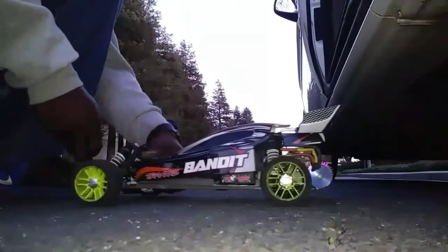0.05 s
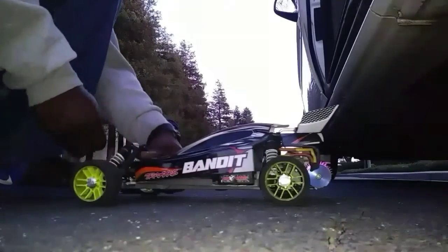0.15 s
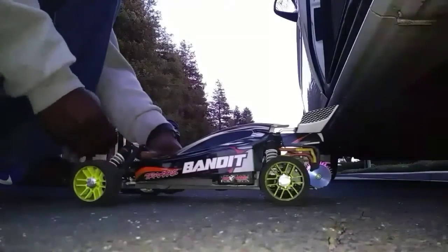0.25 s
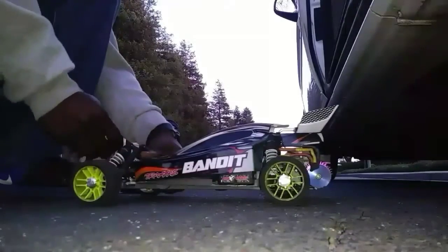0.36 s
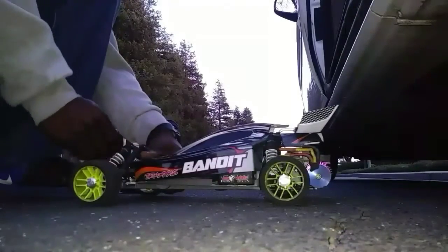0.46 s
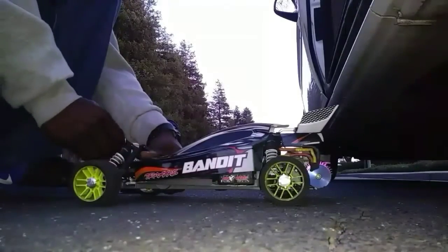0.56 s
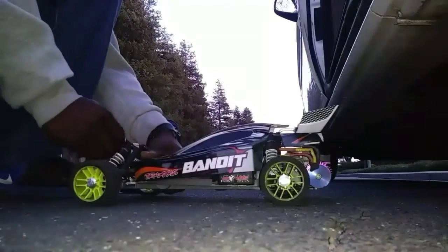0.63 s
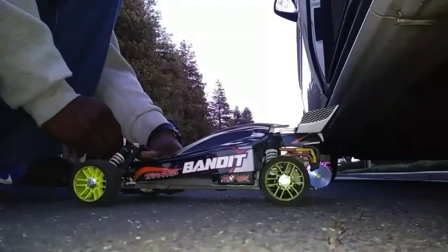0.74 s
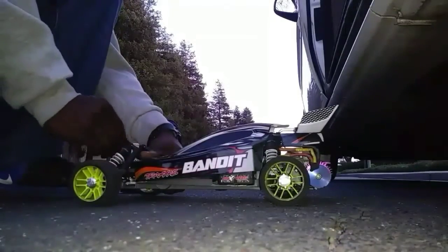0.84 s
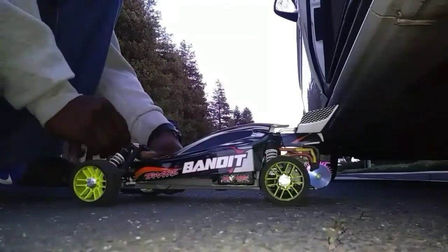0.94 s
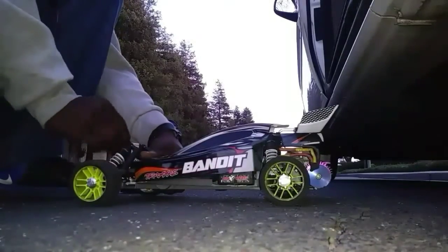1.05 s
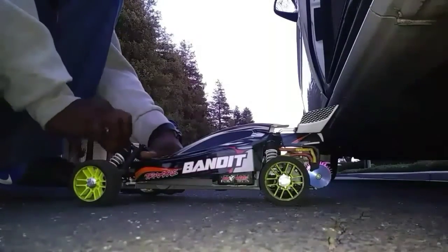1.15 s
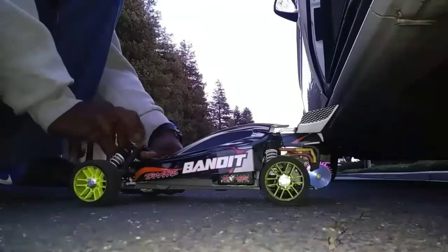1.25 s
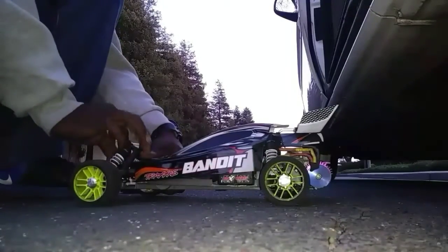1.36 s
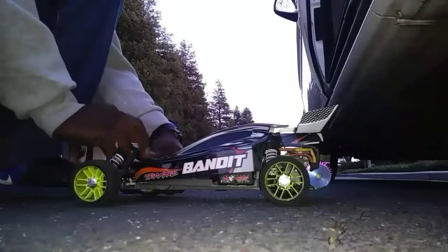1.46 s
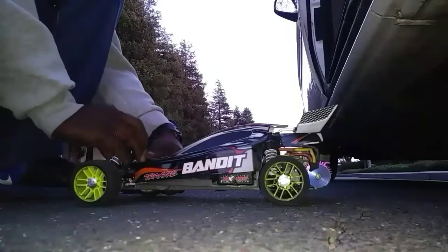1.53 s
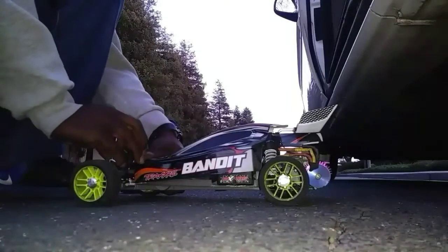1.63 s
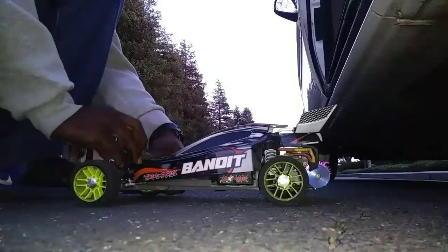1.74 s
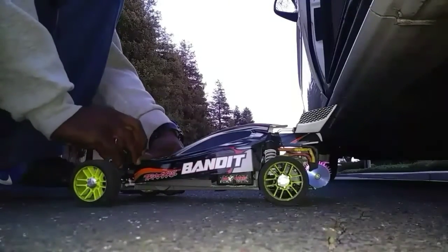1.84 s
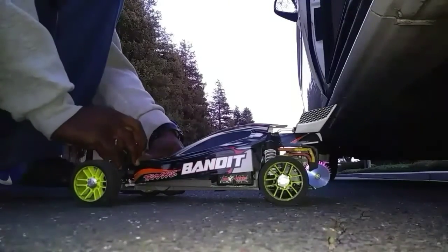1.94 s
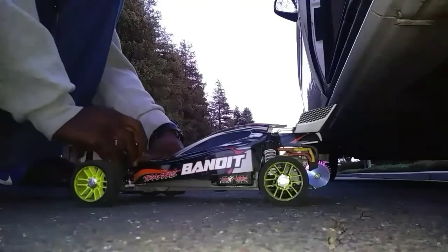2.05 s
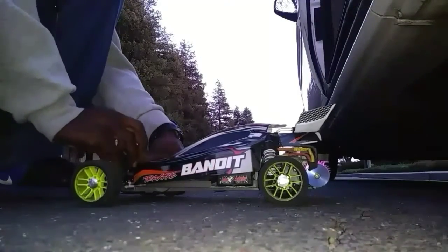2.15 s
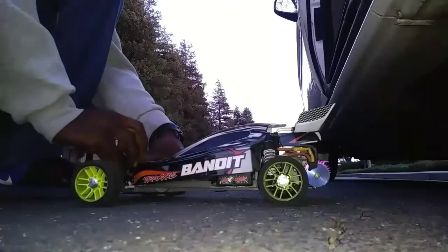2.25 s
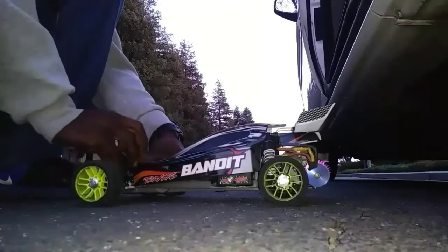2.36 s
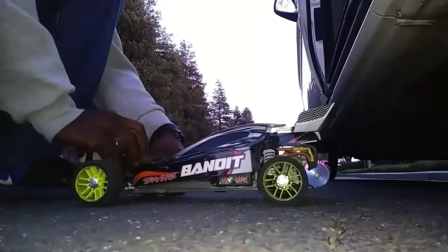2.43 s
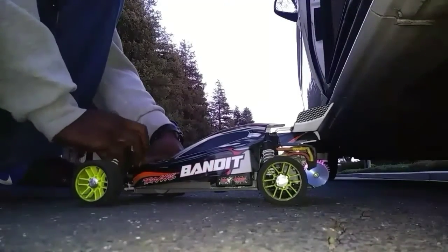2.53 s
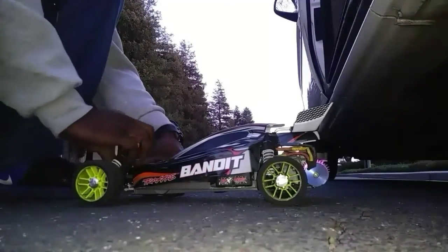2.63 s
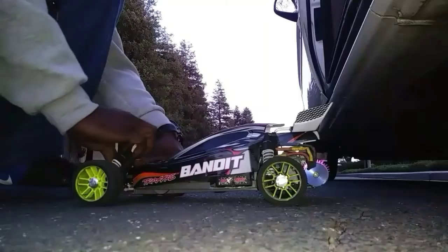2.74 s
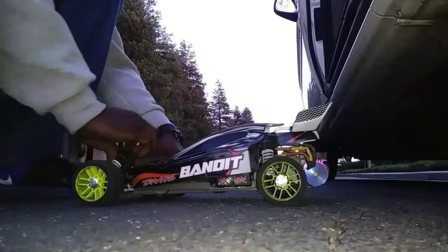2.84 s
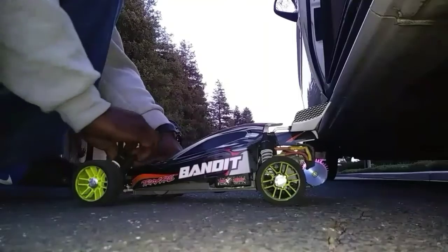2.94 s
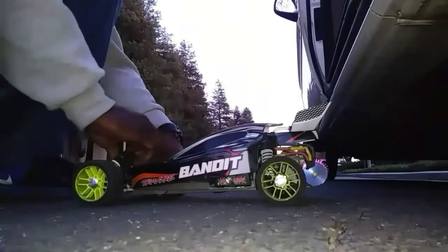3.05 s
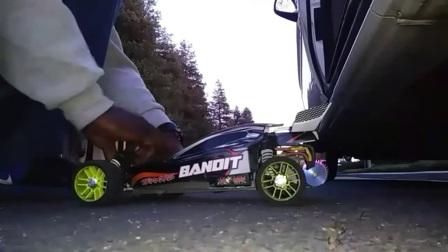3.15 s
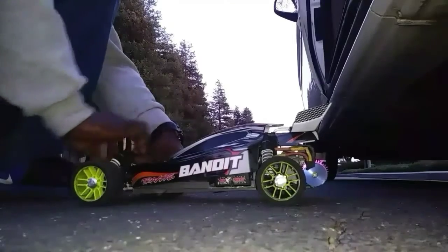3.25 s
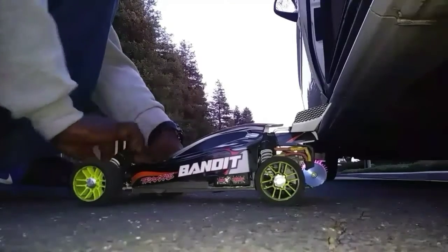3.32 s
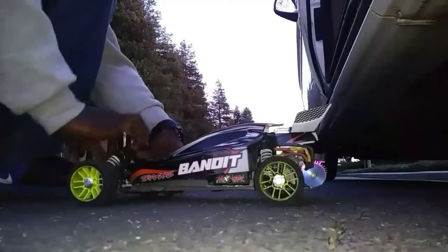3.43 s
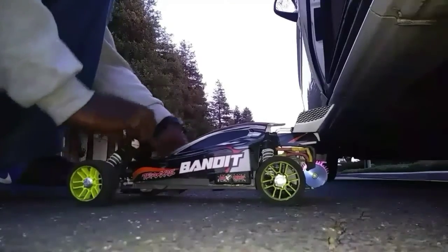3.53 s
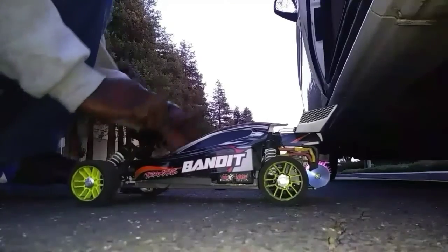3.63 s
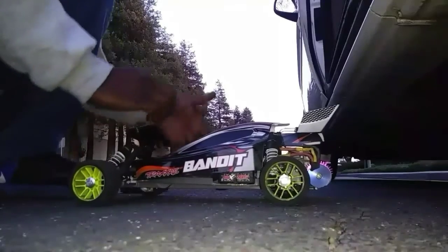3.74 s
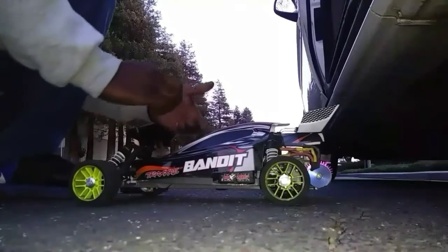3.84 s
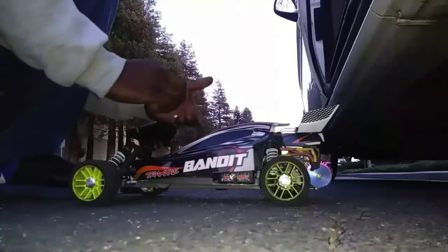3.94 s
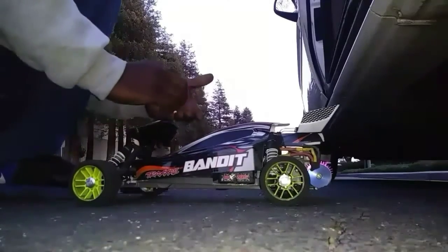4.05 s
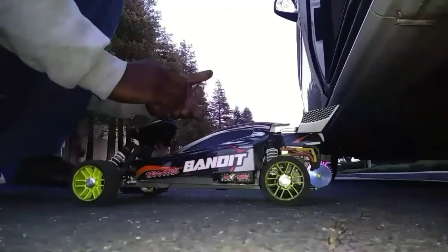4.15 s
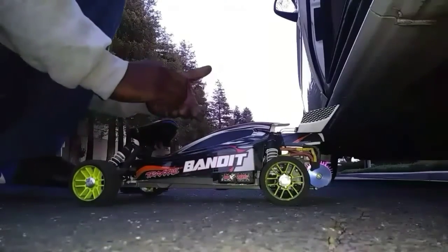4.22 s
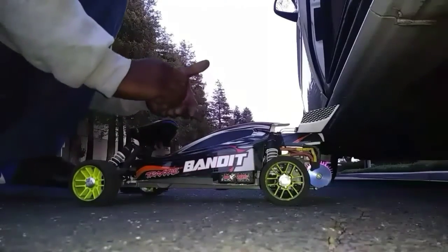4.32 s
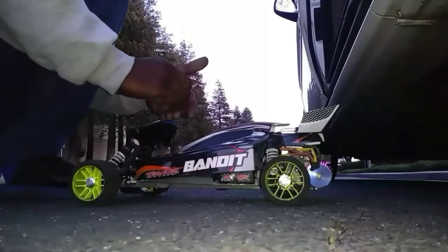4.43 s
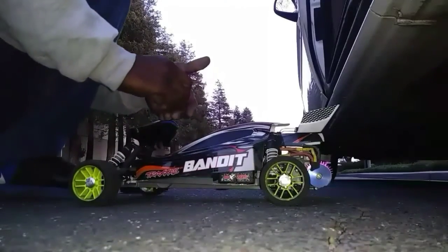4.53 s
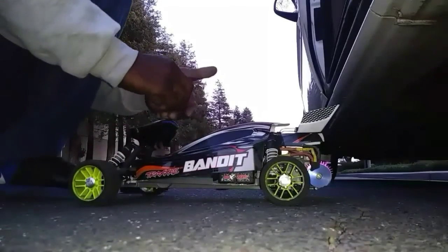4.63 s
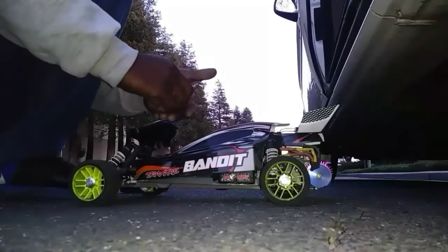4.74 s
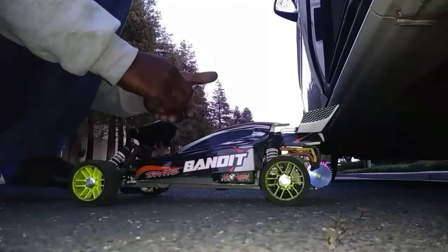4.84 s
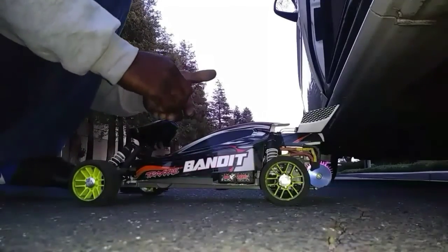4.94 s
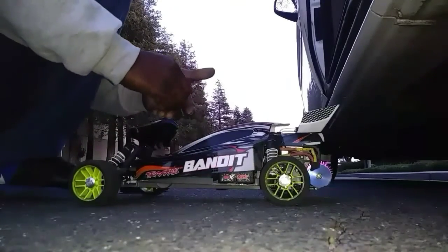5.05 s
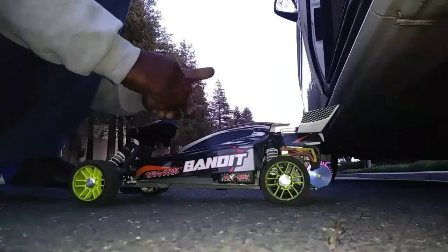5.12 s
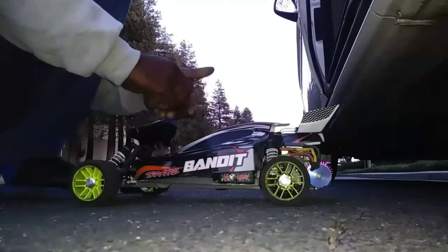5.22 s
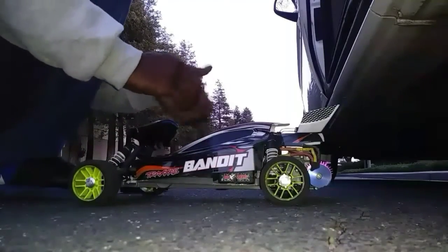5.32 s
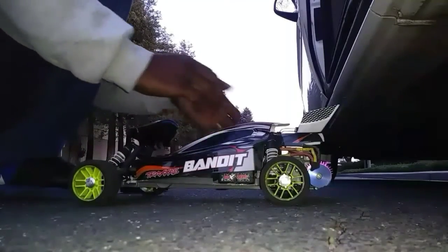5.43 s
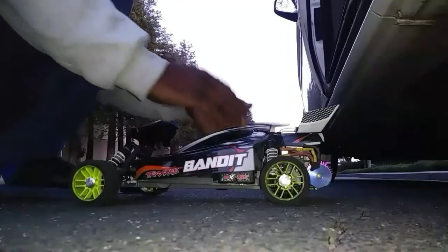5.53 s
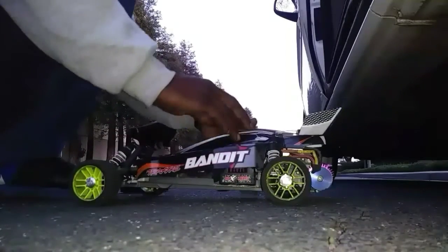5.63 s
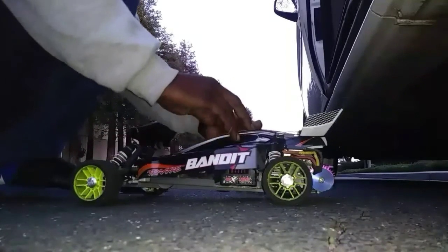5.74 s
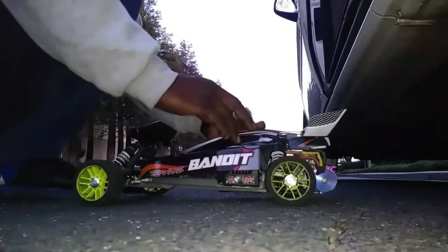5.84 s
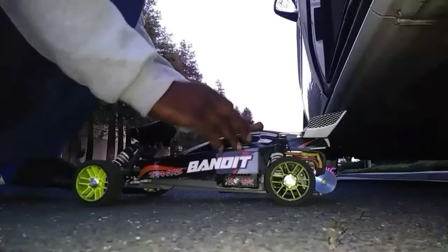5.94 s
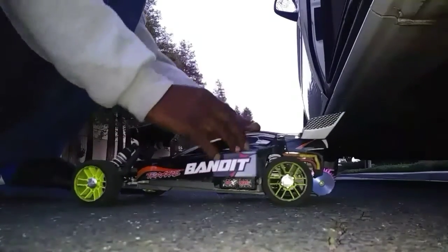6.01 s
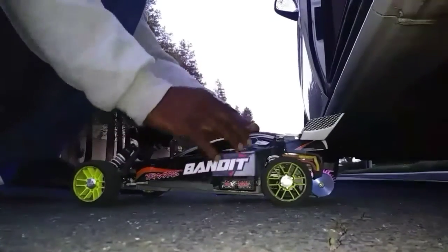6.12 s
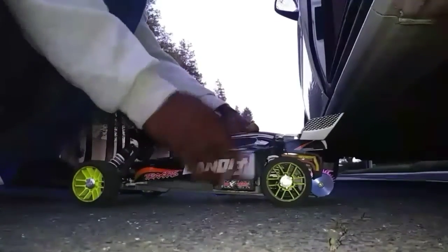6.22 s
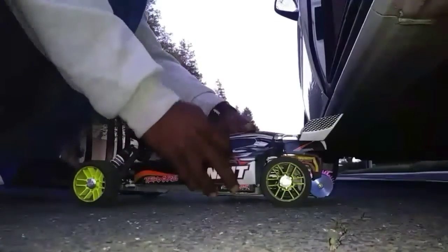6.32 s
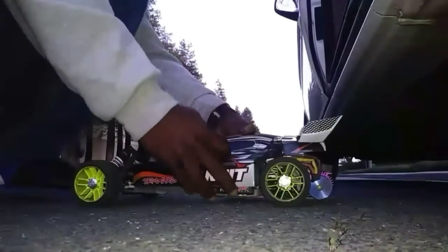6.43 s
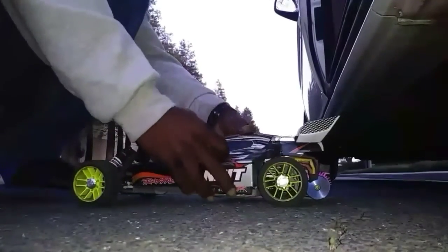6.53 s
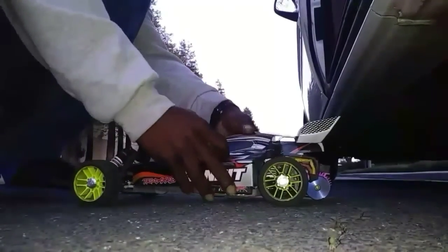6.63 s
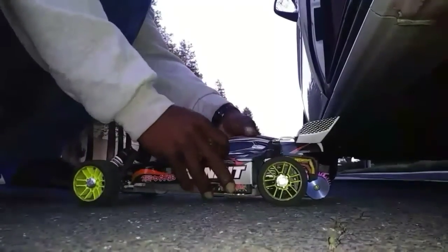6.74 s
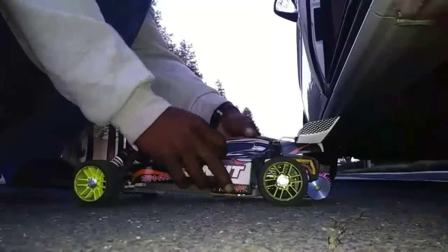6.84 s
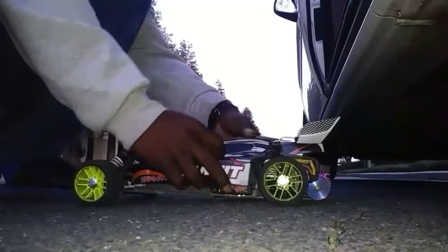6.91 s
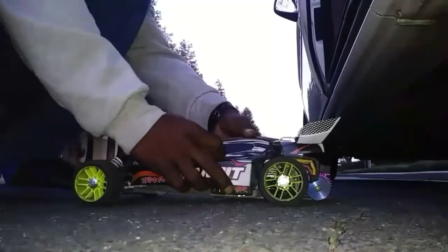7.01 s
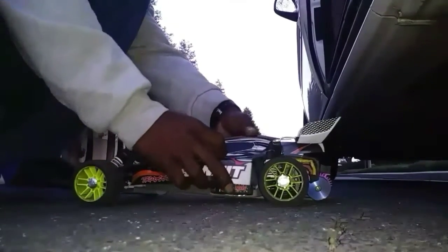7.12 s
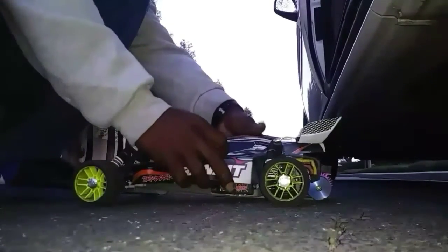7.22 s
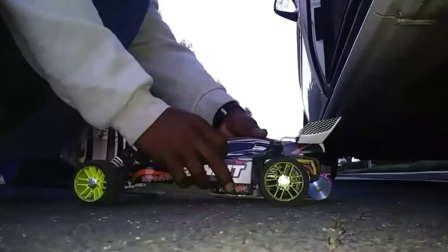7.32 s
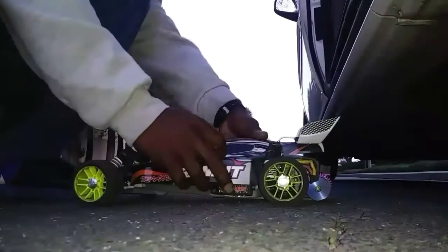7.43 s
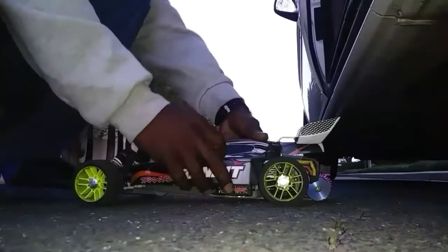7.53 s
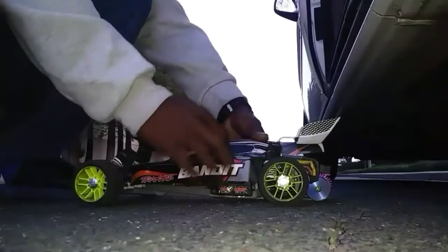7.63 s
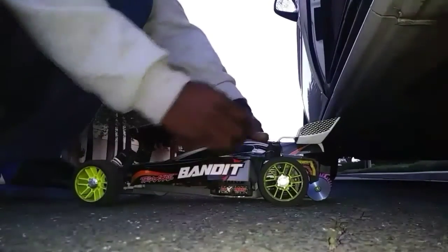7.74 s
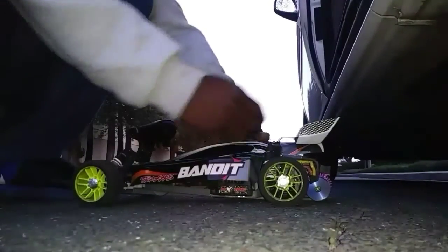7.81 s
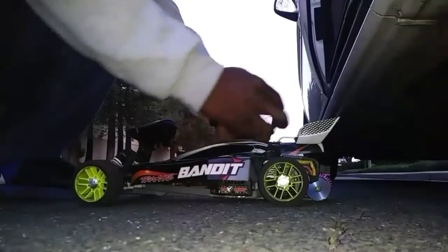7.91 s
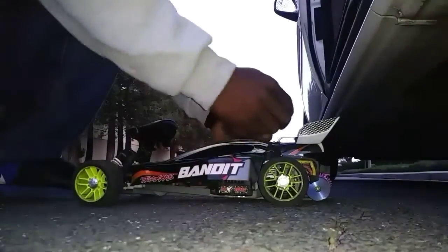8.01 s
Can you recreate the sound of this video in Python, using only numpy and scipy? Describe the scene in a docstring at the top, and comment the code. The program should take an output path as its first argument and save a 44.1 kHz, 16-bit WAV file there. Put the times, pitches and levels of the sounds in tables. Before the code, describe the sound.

Fingers snap clips and tap a thin plastic model car shell outdoors, with irregular clicks, rattles and rubbing over very faint distant traffic.

```python
"""Hands fit parts on a small plastic model car on asphalt: clips snap, the thin shell is tapped, scraped, rubbed.
Noise bursts and stick-slip grains excite the resonant modes of the shell; soft bumps are wavering low tones.
A parked van's side and the ground return a short diffuse tail, made by convolution with decaying noise.
Behind lie far traffic, a lumpy coloured noise, and a faint grainy whine of narrow noise bands.
A pocket camera's noise suppressor sinks whatever is not clearly above the steady background."""
import sys
import numpy as np
from scipy import signal
from scipy.fft import rfft, irfft, next_fast_len
from scipy.io import wavfile
from scipy.ndimage import uniform_filter1d

SR = 44100
rng = np.random.default_rng(int(sys.argv[2]) if len(sys.argv) > 2 else 0)


def log_audio(samples):
    """Write samples as a 16-bit WAV file to the path given in sys.argv[1]."""
    # one column per channel
    frames = np.atleast_2d(samples).T
    # limit to full scale, then quantise
    limited = np.clip(frames, -1, 1)
    pcm = np.round(limited * 32767).astype(np.int16)
    wavfile.write(sys.argv[1], SR, pcm)


N = 355874

# Far traffic spectrum, relative: (frequency [Hz], spectral density [dB per Hz])
TRAFFIC_SPECTRUM = [(25, -29), (40, -13), (55, -1.5), (108, -6.5), (330, -14.5), (750, -13.5),
                    (1300, -17.5), (4000, -24.5), (8000, -36.5)]
TRAFFIC_DB = -53  # RMS before the lumps are added
# Whine, noise bands: (centre [Hz], width of one of two cascaded resonances [Hz], level [dB], flicker [dB])
WHINE_BANDS = [(167.3, 8.3, -66.5, 0), (441, 88, -68, 3.5), (1459, 90, -68, 2), (1880, 120, -74, 3),
               (2290, 130, -73, 2.5), (2902, 250, -77, 3), (4300, 130, -79, 3), (4930, 230, -65.5, 0.5),
               (5260, 160, -74.5, 3), (5720, 260, -79.5, 3)]
YARD_T60_S, YARD_DB = 0.17, -13.5
# Low bumps that swell and fade: (time of the top [s], peak level [dB], pitch [Hz], Gaussian length [s])
LOW_BUMPS = [(0.458, -48.5, 297, 0.035), (5.311, -41.5, 102.7, 0.022), (5.914, -43.5, 163.7, 0.033),
             (6.904, -43, 69.2, .04), (7.546, -45.5, 78.9, 0.043)]

# Modes of the plastic shell: (frequency [Hz], gain [dB], t60 before the damping factor shortens it [s])
SHELL_MODES = [(251, 5.5, 0.12), (397, 3, 0.22), (546.5, 5, 0.11), (320, -10, 0.19), (1087, 4, 0.19),
               (1386, -5, 0.58), (2028, -10.5, 0.19), (4910, -2, 0.019)]
# Centres of bass, mid and treble: (frequency [Hz])
BAND_CENTRES = [500, 2000, 6500]
# Fingers sliding on the shell, one list per spell: (time [s], mid level [dB], treble minus mid [dB])
RUB_SPELLS = [
    [(2.67, -86, -11.5), (2.9, -62.5, -14.5), (3.128, -61, -14.5), (3.26, -45, -18.5), (3.43, -64.5, -22.5),
     (3.52, -52, -21.5), (3.78, -56, -26)],
    [(5.55, -52, -16), (5.65, -43, -5.5), (5.73, -46.5, -13), (5.77, -51, -3.5), (6.12, -54, -28),
     (6.41, -51.5, -14), (6.55, -58.5, -20), (6.745, -45.5, -35.5), (6.96, -62, -19), (7.07, -50.5, -21.5),
     (7.22, -47, -16), (7.3, -52.5, -17), (7.5, -50, -20), (7.67, -61.5, -6), (8.07, -58, -10)],
]
RUB_BASS_DB = -8.5  # relative to mid
PATCHY_DB = 1.3  # each band of the rubbing flickers by itself

# Short scrapes that swell and die: (time [s], peak level [dB], contact pitch [Hz], rattle t60 [s])
SCRAPE_EVENTS = [(0.01, -38, 2640, 0.18), (0.3605, -43, 2590, 0.45), (0.64, -43.5, 2004, 0.45),
                 (0.9893, -46, 2313, 0.26), (1.508, -45, 2370, 0.11), (1.737, -45, 1407, 0.26),
                 (2.682, -41.5, 5550, 0.55), (2.7458, -36.5, 3490, 0.19), (2.986, -44, 3770, 0.16),
                 (3.339, -31.5, 648, 0.27), (3.4577, -37.5, 1953, 0.39), (3.956, -38.5, 3410, 0.58),
                 (4.1423, -37, 5586, 0.13), (5.4529, -20.5, 1870, 0.12), (5.462, -11, 1900, 0.076),
                 (6.239, -31, 950, 0.2), (6.5724, -27.5, 1230, 0.41), (6.614, -19.5, 1050, 0.076),
                 (6.777, -33, 1195, 0.4), (7.429, -14.5, 4860, 0.035), (7.4529, -31, 5200, 0.2),
                 (7.4815, -28, 1900, 0.051)]
SCRAPE_RISE_S = 0.0045
# tilt against mid at 1 kHz contact pitch: smaller contacts move less of the shell and are brighter
SCRAPE_BASS_DB, BASS_DB_PER_OCTAVE = -1.5, -6.5
SCRAPE_TREBLE_DB, TREBLE_DB_PER_OCTAVE = -11.5, 1
# Snaps and taps: (time [s], peak level [dB], contact pitch [Hz], bass tilt against mid [dB],
# treble tilt against mid [dB], rattle t60 [s])
HIT_EVENTS = [(1.223, -41, 3550, -45, -5.5, 0.25), (1.627, -32, 912, 8.5, -25.5, 0.12),
              (2.132, -42.5, 1140, 0, -37, 0.18), (2.427, -34.5, 3600, -41.5, -15, .12),
              (3.057, -31, 5400, -68, -10.5, 0.43), (3.1385, -27.5, 4900, -46, -9, 0.12),
              (3.1701, -19, 4200, -40, -6, 0.15), (3.183, -29, 2600, -27, -7, 0.056),
              (3.1963, -11.5, 2520, -13, -12.5, 0.052), (3.263, -26.5, 2580, -3, -8, 0.037),
              (3.491, -30, 1110, -8, -7, 0.26), (3.5493, -26.5, 4800, -46, -6.5, 0.16),
              (3.5927, -7, 2960, -34.5, -16.5, 0.032), (3.6538, -29.5, 5300, -22, -7.5, 0.13),
              (4.441, -38.5, 3900, -54.5, -22.5, 0.048), (4.466, -32, 4070, -56, -18, 0.14),
              (5.477, -7, 990, 7, -14, 0.095), (5.5098, 5, 1930, 5, -7.5, 0.061),
              (5.521, -6, 5100, 11, -12.5, 0.037), (5.615, -31, 1360, 16, -21, .04),
              (5.8733, -30.5, 2260, -10, -6, 0.12), (5.895, -34, 1240, 1.5, -15, 0.087),
              (5.9414, -37, 1300, -22, -12, 0.074), (6.038, -29.5, 2190, -28.5, -14.5, 0.066),
              (6.1534, -11.5, 1380, -1.5, -5, 0.075), (6.177, -18.5, 1480, 4.5, -4, 0.099),
              (6.189, -19.5, 1420, 5.5, -9, 0.097), (6.254, -33, 1100, 17, -14, 0.027),
              (6.313, -31.5, 1250, -12, -23, 0.2), (6.359, -29.5, 1190, -4, -7, 0.05),
              (6.4291, -20, 1240, -9, -18.5, 0.19), (6.443, -28, 1320, 9, -25, 0.24),
              (6.469, -24, 1090, -2, -17.5, 0.13), (6.489, -24, 1370, 3.5, -10, 0.25),
              (6.5974, -13.5, 1300, -1, -16, 0.093), (6.804, -29, 1250, 3, -8.5, 0.04),
              (6.937, -36.5, 1360, -12, -10, 0.095), (7.0184, -20.5, 1280, 8.5, -16, 0.089),
              (7.05, -30, 2300, 17, 0, 0.23), (7.153, -38.5, 1190, -9, -26.5, 0.023),
              (7.176, -25.5, 1190, -10.5, -18, 0.035), (7.322, -27.5, 1100, -12.5, -19, 0.09),
              (7.3615, -11.5, 2070, -13.5, -20.5, 0.052), (7.389, -10, 2140, 0.5, -10.5, 0.067),
              (7.709, -28.5, 940, -5.5, -13, .12), (7.9787, -29.5, 1180, 5, -10.5, 0.089),
              (8.0351, -22, 1260, 8.5, -17.5, 0.098), (8.0592, -22, 2410, -5, -10, 0.1)]
HIT_RISE_S, CRACK_S = 0.0006, 0.00094
AIR_DB, AIR_DB_PER_DB = -1.5, 1  # 12 kHz over treble for a 0 dB blow; softer blows reach less high
# Valleys in the hits, scrapes and rubs: (centre [Hz], Gaussian width [Hz], gain [dB])
HANDLING_VALLEYS = [(810, 110, -5.5), (4050, 250, -5)]

# Camera's dull voice-band filter: (frequency [Hz], gain [dB])
VOICE_BAND_FILTER = [(30, -8), (100, 0), (8200, 0), (9300, -15), (11500, -32), (16000, -36)]
DEPTH_DB = -25  # lowest gain of the suppressor
HISS_DB, TOP_HZ = -79, 15800


def undb(db):
    """Level law: an amplitude ratio is 10 to the power of dB / 20."""
    return 10 ** (np.asarray(db) / 20)


def unit(x):
    """Normalization: division by the root mean square gives unit power."""
    return x / np.sqrt(np.mean(x ** 2))


def shape(x, gain):
    """Linear filtering: the spectrum is multiplied by a function of frequency."""
    n = next_fast_len(x.shape[-1])
    hz = np.arange(n // 2 + 1) * SR / n + 1  # 1 Hz up, to keep clear of zero
    return irfft(rfft(x, n) * gain(hz), n)[..., :x.shape[-1]]


def colour(points):
    """Spectral envelope: (Hz, dB) points are interpolated along log frequency."""
    hz, db = np.transpose(points)
    return lambda f: undb(np.interp(np.log(f), np.log(hz), db))


def mode(f, hz, width):
    """Damped resonance: a second-order response with gain 1 at its centre."""
    return 1j * f * width / (hz ** 2 - f ** 2 + 1j * f * width)


def walk(rate):
    """Slow modulation: random levels held 1 / rate s, slewed twice, softly limited; spread between 1.5 and 2."""
    k = int(SR / rate)
    steps = np.repeat(rng.standard_normal(N // k + 1), k)
    slewed = uniform_filter1d(uniform_filter1d(steps, k), k)[:N]
    return 3.16 * np.tanh(0.99 * slewed)


def traffic():
    """Broadband noise of far traffic: coloured rumble whose low bands fluctuate independently."""
    far = unit(shape(rng.standard_normal(N), colour(TRAFFIC_SPECTRUM)))
    total = far.copy()
    for hz in (57.6, 110, 186, 257.4):
        band = shape(far, lambda f: np.abs(mode(f, hz, hz * 0.53)) ** 2)
        total += band * (undb(2.57 * walk(9)) - 1)
    return undb(TRAFFIC_DB) * total


def whine():
    """Narrow-band noise: cascaded resonances pick steep bands, most of them flickering independently."""
    total = np.zeros(N)
    for hz, width, db, flicker_db in WHINE_BANDS:
        band = unit(shape(rng.standard_normal(N), lambda f: mode(f, hz, width) ** 2))
        total += undb(db + flicker_db * walk(22)) * band
    return total


def yard(x):
    """Diffuse reflection: van side and ground return a short, exponentially decaying tail."""
    t = np.arange(SR // 2) / SR
    decay = np.exp(-np.log(1000) * t / YARD_T60_S)
    onset = np.minimum(t / 0.0062, 1)
    tail = rng.standard_normal(len(t)) * decay * onset
    return undb(YARD_DB) * signal.fftconvolve(x, tail / np.sqrt(np.sum(tail ** 2)))[:N]


def bumps():
    """Amplitude and frequency modulation: soft low pushes, each a few wavering cycles."""
    t = np.arange(N) / SR
    wavering_t = t + 0.061 * np.cumsum(walk(30)) / SR
    total = np.zeros(N)
    for s, db, hz, length in LOW_BUMPS:
        swell = np.exp(-.5 * ((t - s) / length) ** 2)
        total += undb(db) * swell * np.sin(2 * np.pi * hz * wavering_t)
    return total


def shell(f, scatter_db, damp=5.8, broad_db=-4):
    """Modal superposition: the plastic shell's damped modes, each scattered in level, over a broad response."""
    response = undb(broad_db)
    for (hz, db, t60), scatter in zip(SHELL_MODES, scatter_db):
        width = damp * np.log(1000) / (np.pi * t60)
        response = response + undb(db + scatter) * mode(f, hz, width)
    return response


def rubs():
    """Stick-slip friction: dense grains in uneven gusts drive the shell, levelled in bass, mid and treble."""
    t, rows = np.arange(N) / SR, np.vstack(RUB_SPELLS)
    mid_db = np.interp(t, rows[:, 0], rows[:, 1])
    treble_db = np.interp(t, rows[:, 0], rows[:, 2])
    on = sum((t >= spell[0][0]) & (t < spell[-1][0]) for spell in RUB_SPELLS)
    fade = uniform_filter1d(on * 1., size=2000)

    slips = rng.standard_normal(N) * undb(2.5 * rng.exponential(size=N) + 1.5 * walk(60))
    even = np.zeros(len(SHELL_MODES))  # no scatter among the modes
    body = shape(slips, lambda f: shell(f, even, damp=5.1, broad_db=-1.0) / (1 + (f / 6800) ** 6))

    def flickering_band(hz):
        """Band filtering: a cascaded resonance at unit power, with its own flicker."""
        band = unit(shape(body, lambda f: mode(f, hz, 2.36 * hz) ** 2))
        return undb(PATCHY_DB * walk(25)) * band

    bass, mid, treble = (flickering_band(hz) for hz in BAND_CENTRES)
    return fade * undb(mid_db) * (mid + undb(RUB_BASS_DB) * bass + undb(treble_db) * treble)


def strike(events, crack, clump_db):
    """Impulsive excitation: a dying, clumpy rattle, led by any crack, rings shell and contact resonance."""
    out, t = np.zeros(N + SR), np.arange(2 ** 14) / SR
    lead = 64  # samples kept ahead of each event for the ripple of the zero-phase tilt
    for s, db, hz, bass_db, treble_db, t60, rise in events:
        grains = rng.standard_normal(len(t))
        scatter = rng.standard_normal(len(SHELL_MODES))
        lumps = uniform_filter1d(np.repeat(rng.standard_normal(128), 128), size=48)
        decay = np.exp(-np.log(1000) * t / t60)
        rattle = undb(clump_db * lumps) * decay * (1 - np.exp(-t / rise))
        snap = crack * hz / 2000 * t / CRACK_S * np.exp(1 - t / CRACK_S)
        push = grains * (rattle + snap)
        ring = shape(push, lambda f: shell(f, 3 * scatter) + 1.18 * mode(f, hz, hz / 5))

        air_db = treble_db + AIR_DB + AIR_DB_PER_DB * db
        tilt_hz = [150, *BAND_CENTRES, 12000]
        tilt_db = [bass_db - 20.5, bass_db, 0, treble_db, air_db]
        ring = shape(np.roll(ring, lead), colour(list(zip(tilt_hz, tilt_db))))
        i = int(s * SR) - lead
        out[i:i + len(t)] += ring * undb(db) / np.abs(ring).max()
    return out[:N]


def scrapes():
    """Slow-onset friction: rattles without a crack, tilted in bass and treble by contact pitch."""
    events = []
    for s, db, hz, t60 in SCRAPE_EVENTS:
        octaves = np.log2(hz / 1000)
        bass_db = SCRAPE_BASS_DB + BASS_DB_PER_OCTAVE * octaves
        treble_db = SCRAPE_TREBLE_DB + TREBLE_DB_PER_OCTAVE * octaves
        events.append((s, db, hz, bass_db, treble_db, t60, SCRAPE_RISE_S))
    return strike(events, crack=0, clump_db=2.0)


def hits():
    """Impact: clips and taps give a brief crack and a fast-rising rattle."""
    return strike([(*hit, HIT_RISE_S) for hit in HIT_EVENTS], crack=1.125, clump_db=3.0)


def handling_valleys(f):
    """Spectral notching: Gaussian dips in dB lower parts of the handling sound."""
    return undb(sum(db * np.exp(-.5 * ((f - hz) / width) ** 2) for hz, width, db in HANDLING_VALLEYS))


def scene():
    """Linear superposition: hits, scrapes and rubs with their tail, over bumps, whine and traffic."""
    hands = shape(hits() + scrapes() + rubs(), handling_valleys)
    return (hands + yard(hands) + traffic() + whine() + bumps())[None]


def suppress(x, over_db=6, smooth=0.32, release_s=0.1):
    """Spectral subtraction: bins near the steady local level sink; gain opens at once, closes slowly."""
    spec = signal.stft(x, nperseg=512)[2]
    power = signal.lfilter([1 - smooth], [1, -smooth], np.abs(spec) ** 2)
    quiet = np.percentile(power, 25, axis=-1)
    steady = np.exp(uniform_filter1d(np.log(quiet), size=41))  # averaged over neighbouring bins
    threshold = undb(2 * over_db) * steady[:, None]  # doubled since this is power
    gain = np.maximum(1 - threshold / power, undb(DEPTH_DB))
    gain[:2] = 1  # the deepest bass passes untouched
    fall = np.exp(-256 / SR / release_s)  # per hop of 256 samples
    for k in range(1, gain.shape[1]):
        gain[:, k] = np.maximum(gain[:, k], fall * gain[:, k - 1])
    return signal.istft(spec * gain, nperseg=512)[1][:N]


def record(dry):
    """Transmission chain: suppressor, soft overload, dull voice-band filter, circuit hiss, steep top cut."""
    x = .95 * np.tanh(suppress(dry[0]) / .95)
    x = shape(x, colour(VOICE_BAND_FILTER)) + undb(HISS_DB) * rng.standard_normal(N)
    top_cut = signal.ellip(8, .2, 70, TOP_HZ, fs=SR, output="sos")
    return signal.sosfilt(top_cut, x)[None]


dry = scene()
out = record(dry)
log_audio(out)
```